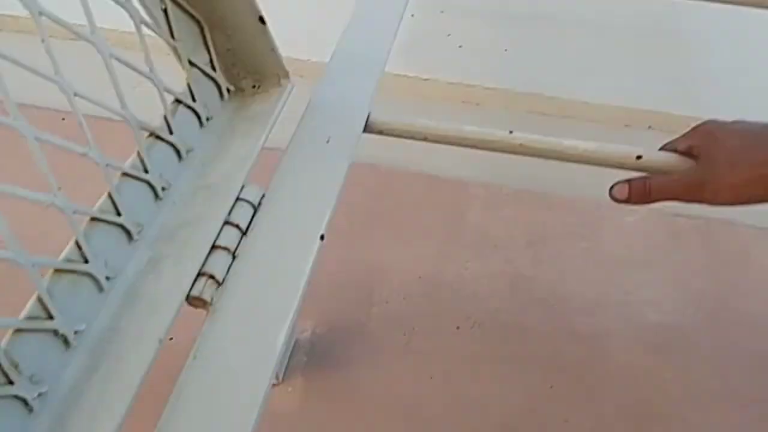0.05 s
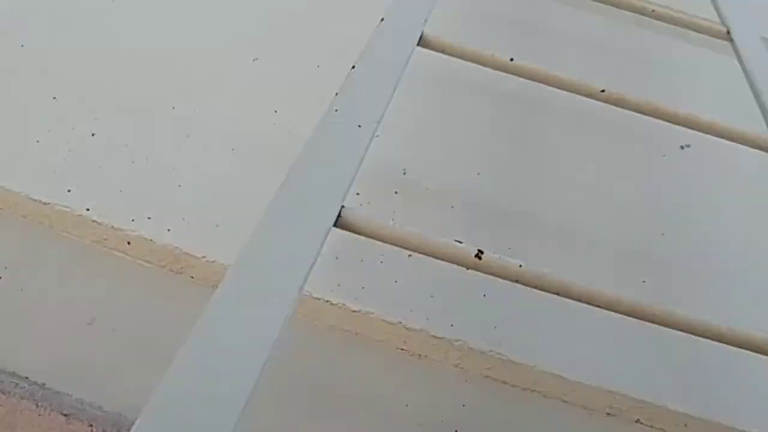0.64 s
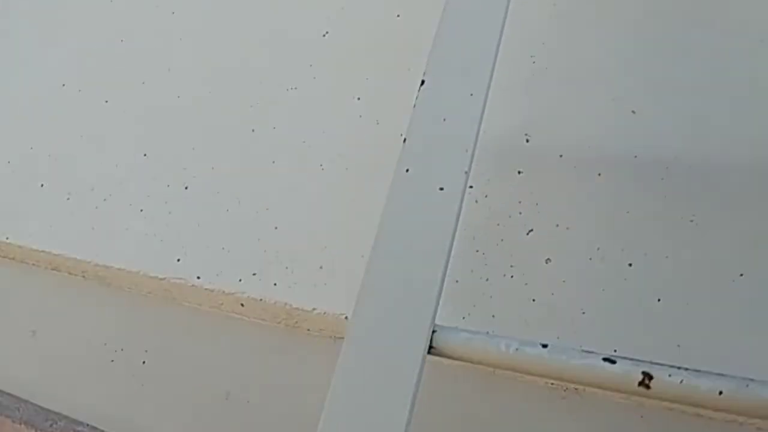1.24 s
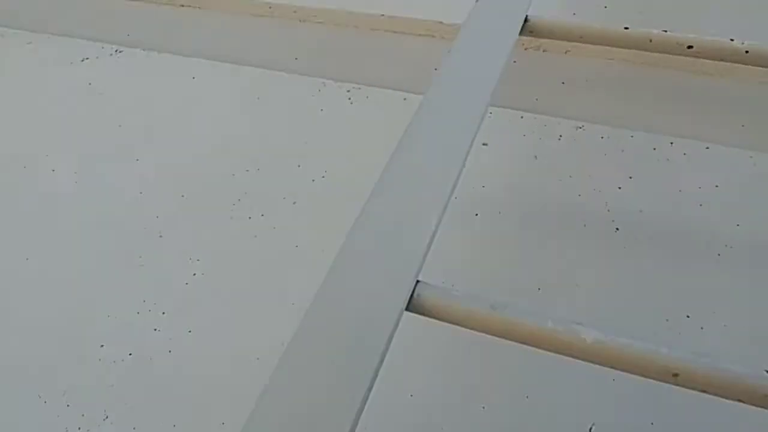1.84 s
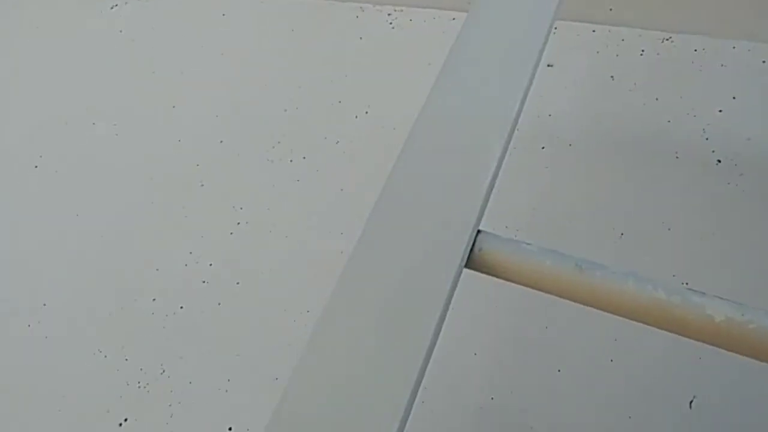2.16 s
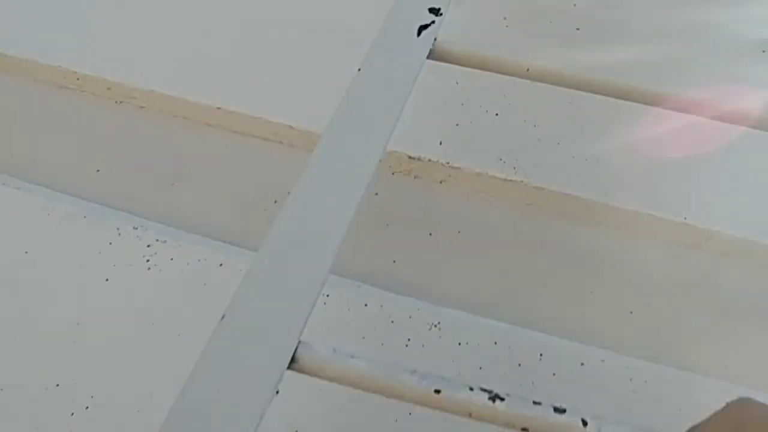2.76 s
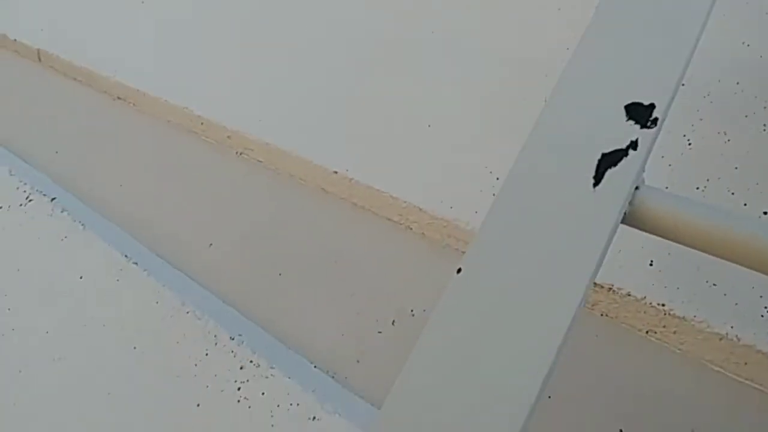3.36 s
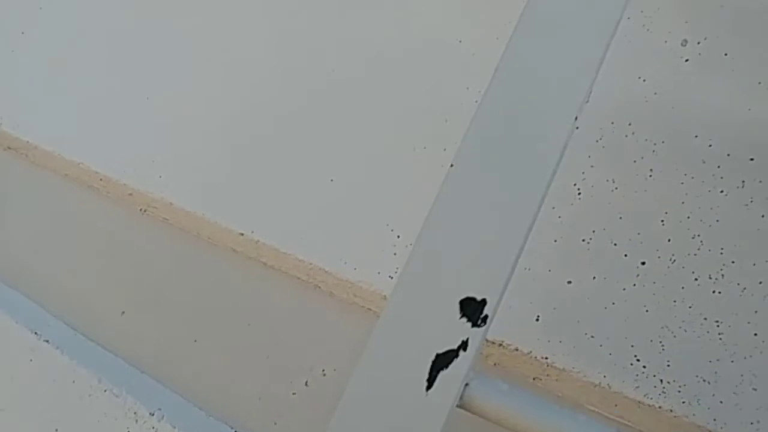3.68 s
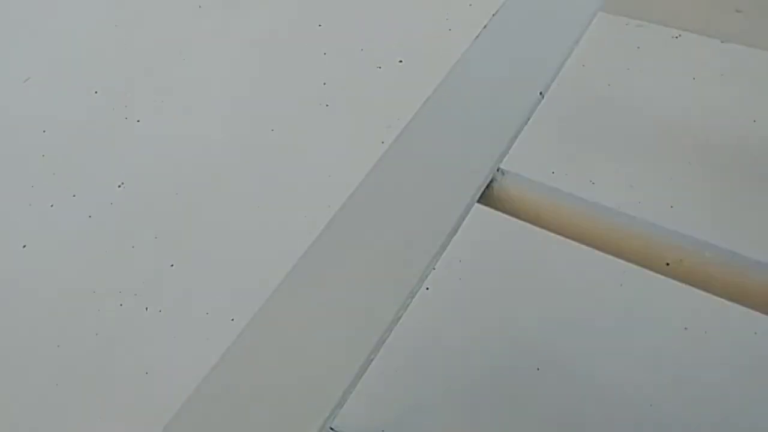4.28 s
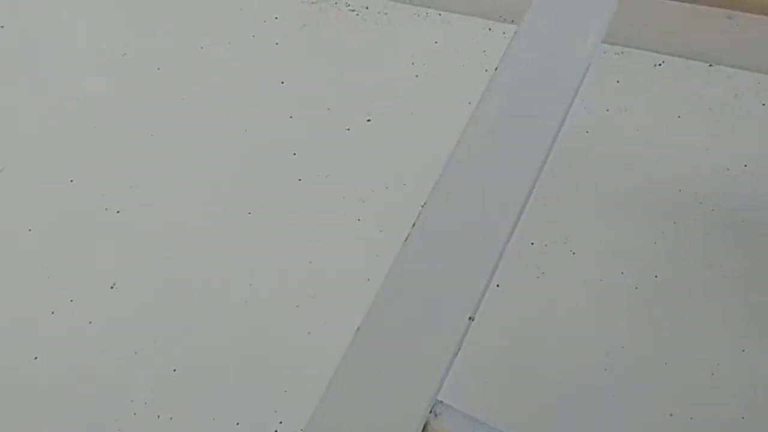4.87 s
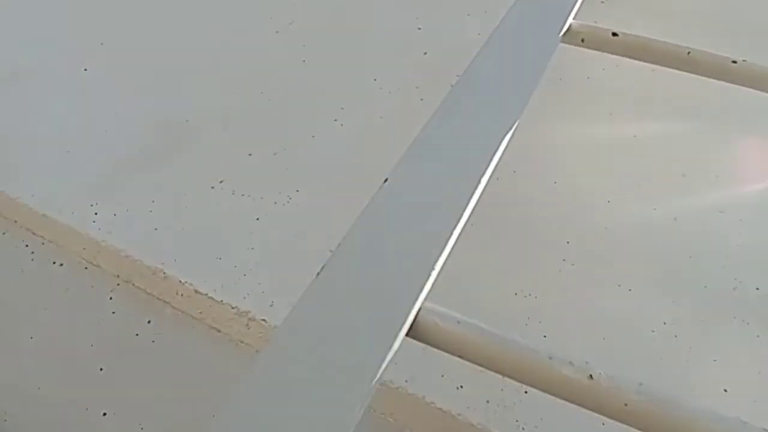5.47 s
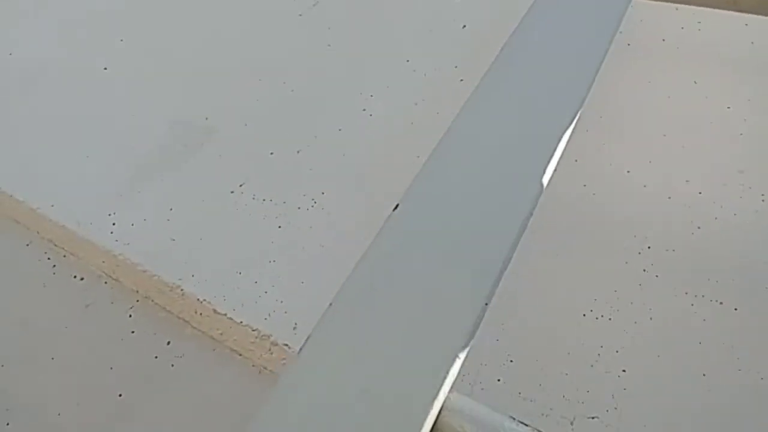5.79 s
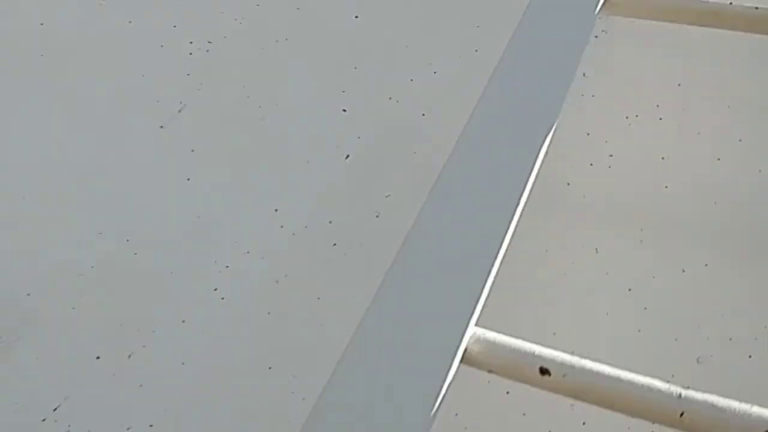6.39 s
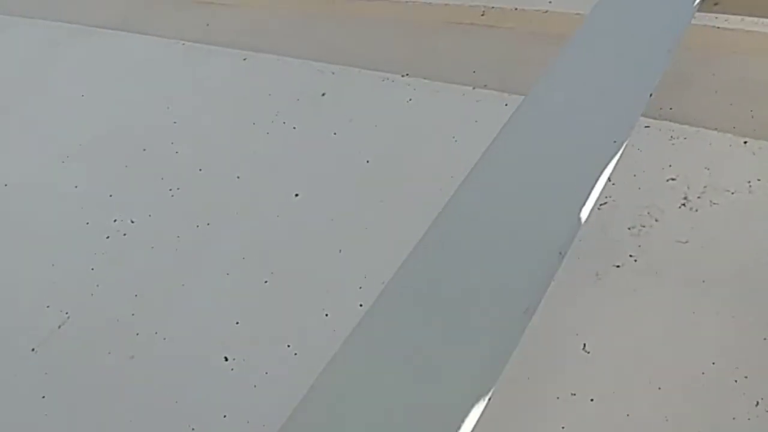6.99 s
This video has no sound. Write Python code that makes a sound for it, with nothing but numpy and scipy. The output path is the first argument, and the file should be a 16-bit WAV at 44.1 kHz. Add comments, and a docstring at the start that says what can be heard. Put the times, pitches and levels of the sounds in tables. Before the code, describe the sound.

Loose metal pieces on a climber's gear jingle and clink close to the microphone, in uneven bursts with each move up a steel ladder. Hands and soles make hollow knocks on the rungs, with a sharp tap near the start and another near the end. Low boot thuds come mostly in the second half. Clothes rustle lightly over an outdoor rumble and a faint machine hum.

```python
"""Three small loose metal pieces on a climber's gear chatter against each other at every move up a
steel ladder. Trains of tiny impacts set them ringing: bright clinks over a light tinkle. Hard taps and
hollow knocks of hands and soles sound on the rungs; boots thud in the ladder's low modes. An outside
wall adds a short scatter. Behind it: outdoor rumble, air, rustling clothes and a faint machine hum."""
import sys
import numpy as np
from scipy import signal
from scipy.fft import rfft, irfft, next_fast_len
from scipy.io import wavfile

SR = 44100
rng = np.random.default_rng(int(sys.argv[2]) if len(sys.argv) > 2 else 0)


def materialize(psi):
    """Save the field psi as 16-bit PCM at rate SR to the path in sys.argv[1].

    A 1-D psi becomes a single channel; in a 2-D psi each row is a channel.
    """
    bounded = np.clip(np.atleast_2d(psi).T, -1, 1)
    quanta = np.round(bounded * 32767).astype(np.int16)
    wavfile.write(sys.argv[1], SR, quanta)


N = 319284
T = np.arange(N) / SR


def amp(db):
    """Decibels to gain."""
    return 10 ** (np.asarray(db) / 20)


def unit_rms(x):
    """Scale to rms 1."""
    return x / np.sqrt(np.mean(abs(x) ** 2) + 1e-20)


def curve_at(points, hz, column=1):
    """Interpolate a table column over log frequency."""
    table = np.array(points, float)
    return np.interp(np.log(hz + 1), np.log(table[:, 0] + 1), table[:, column])


def add(mix, start_s, sound):
    """Mix a sound in at start_s."""
    part = mix[..., max(round(start_s * SR), 0):][..., :sound.shape[-1]]
    part += sound[..., :part.shape[-1]]


def drift(rate_hz):
    """Slow random motion, rms 1."""
    knots = rng.standard_normal(2000)
    return unit_rms(np.interp(T * rate_hz, np.arange(len(knots)), knots))


def ring(drive, hz, t60_s):
    """Complex resonator: magnitude is the envelope, real part the sound."""
    pole = np.exp((2j * np.pi * hz - np.log(1000) / t60_s) / SR)
    return signal.lfilter([1], [1, -pole], drive + 1e-18)


# tones heard in each bright clink: a main ring near 10-11 kHz with fainter, evenly spaced side tones: f/Hz,
# left/dB, right/dB
FIRST_PARTIALS = [(899, -25, -33), (2990, -22, -33), (4790, -25, -36), (6880, -14, -26), (8680, -27, -42),
                  (10776, 0, -19), (12600, -30, -42), (14662, -15, -30)]
SECOND_PARTIALS = [(1500, -26, -32), (2392, -22, -29), (5390, -25, -26), (6283, -12, -18), (9297, -20, -35),
                   (10174, 0, -16), (14065, -11, -13)]
# partials of the third piece: f/Hz, left/dB, right/dB
THIRD_PARTIALS = [(1680, -21, -23), (2050, -22, -24), (2460, -21, -16), (3290, -14, -17), (3560, -23, -17),
                  (4090, -18, -21), (6378, -2, 1), (7600, -17, -17), (8090, -16, -24), (11060, -7, -18),
                  (11490, -8, -7), (14100, -8, -6), (15130, -20, -14), (15385, -7, -1.5)]
# gear clinks: t/s, chatter/s, level/dB, second piece over first/dB, hardness/dB
CLINKS = [(0.107, 0.0034, -29, 5, -3.5), (0.281, 0.0025, -32.5, -18, -8.5),
          (0.396, 0.0028, -15.5, -25, -38), (0.544, .006, -17, 1, -13.5), (0.573, 0.01, -18.5, -22, -17),
          (0.672, 0.0092, -15.5, -18, -15.5), (0.7, 0.018, -10, -3, -12.5),
          (0.839, 0.0081, -22.5, -30, -7.5), (1.154, 0.022, -15, -19, -18), (1.44, 0.004, -23, -5, -19),
          (1.625, 0.035, -6.5, -4, -20.5), (1.674, 0.017, -19, 17, -2), (1.73, 0.045, -24, 9, -6.5),
          (1.768, 0.0042, -28, 1, 5), (1.792, 0.014, -20, -13, -10.5), (1.868, 0.036, -19, -8, -17.5),
          (1.954, 0.012, -19, 11, -29), (2.001, 0.0095, -14.5, -6, -23), (2.058, 0.015, -22.5, 5, -15),
          (2.412, 0.002, -31, 5.5, -12.5), (2.652, 0.04, -8, 3.5, -28), (2.735, .016, -22, 1, -25),
          (2.782, 0.032, -22, -17, -3), (2.801, 0.022, -11, 14, -16), (3.077, 0.012, -13, -11, -9.5),
          (3.222, 0.0046, -16.5, 1, -25), (3.262, 0.0041, -22.5, 12, -11.5), (3.325, 0.0025, -14, -16, -8),
          (3.534, 0.0037, -25.5, 0, -15), (3.698, .0024, -22, -4, -18.5), (3.735, 0.0037, -15, -16, -14.5),
          (3.872, 0.018, -14.5, -6, -40), (3.97, 0.016, -7.5, 7, -14.5), (3.995, 0.02, -23.5, 1, -1.5),
          (4.024, .016, -14, 9, -32), (4.059, 0.0011, -15.5, -16, -22), (4.076, 0.0023, -16.5, -22, -26),
          (4.455, .004, -21, 6, -13), (4.469, 0.0073, -12, -7, -19.5), (4.527, 0.0012, -12, -18, -20.5),
          (4.699, 0.0016, -23.5, -8, -21), (4.991, 0.0023, -23, 4, -13.5), (5.067, 0.022, -23, -1, -18),
          (5.203, 0.0069, -12, -3, -19), (5.223, 0.024, -10.5, 9, -13), (5.38, 0.006, -25, 1, -20),
          (5.449, 0.019, -27, -11, -9), (5.486, 0.0069, -23.5, 0, -2.5), (5.547, 0.01, -23.5, 11, -29),
          (5.666, 0.0054, -16.5, 1, -22), (5.68, .003, -21, 7, -4.5), (6.108, 0.0018, -40.5, -18, -3),
          (6.164, 0.0022, -23.5, -22, -17.5), (6.217, 0.0011, -24.5, 1, -18),
          (6.237, 0.0013, -19.5, 18, -32), (6.276, 0.0051, -16, 6.5, -15.5), (6.477, 0.022, -14, 16, -18),
          (6.513, 0.005, -9, -28, -21), (6.551, 0.0066, -7.5, -31, -11), (6.595, 0.012, -10.5, -14, -10.5),
          (6.938, 0.011, -15, -27, -18.5), (7.055, 0.0018, -11, 18, -27), (7.115, 0.0053, -14.5, 10, -14),
          (7.13, 0.0018, -14, -11, -21)]


def clinks(choked_t60_s=0.0027, t60_per_chatter=3.3, lead_in_db=-27.5, settle_s=0.0038,
           choke_s=0.0023, choke_db=12, scrape_db=-12):
    """Faint lead-in, hit, rebounds. Brief clinks are choked; hard ones add third piece and scrape."""
    rings, scrapes = np.zeros((2, N)), np.zeros((2, N))
    lead = SR // 150
    t = np.arange(-lead, SR // 8) / SR
    onset = np.where(t < 0, amp(lead_in_db) * (1 - t / t[0]), 1)
    for start_s, chatter_s, level_db, balance_db, hard_db in CLINKS:
        first_db = level_db - 10 * np.log10(1 + amp(balance_db) ** 2)  # two pieces share the energy
        second_db = first_db + balance_db - 2.5
        third_db = level_db + hard_db - 4.5
        held = slice(lead, lead + int((chatter_s + 0.004) * SR))
        envelope = onset * np.exp(-np.maximum(t - chatter_s, 0) / settle_s)
        t60_s = choked_t60_s + t60_per_chatter * chatter_s
        impacts = np.zeros(len(t))
        pieces = (FIRST_PARTIALS, first_db), (SECOND_PARTIALS, second_db), (THIRD_PARTIALS, third_db)
        for partials, db in pieces:
            drive = impact_train(len(t), per_s=900, spread_db=8) * envelope
            drive[lead] = 2  # main hit
            add(rings, start_s + t[0], amp(db) * metal_piece(drive, partials, t60_s, held))
            impacts += drive
        noise = scrape(impacts, pole=0.985)
        noise /= np.sqrt(np.mean(noise[:, held] ** 2))
        noise_db = level_db + hard_db + scrape_db + choke_db * np.exp(-chatter_s / choke_s)
        add(scrapes, start_s + t[0], amp(noise_db) * noise)
    return rings + contact_colour(scrapes)


def impact_train(size, per_s, spread_db):
    """Tiny random impacts of uneven strength."""
    strength = amp(spread_db * np.minimum(rng.exponential(1, size), 3))
    return strength * rng.choice([-1, 1], size) * (rng.random(size) < per_s / SR)


def metal_piece(drive, partials, t60_s, held, clearance=1.33, detune_hz=13.5, scatter_db=1.5):
    """A piece rings, detuned by contact, its swing limited by its neighbours; level set over held."""
    out = np.zeros((2, len(drive)))
    for hz, left_db, right_db in partials:
        tone = ring(drive, hz + detune_hz * rng.standard_normal(), t60_s)
        power = abs(tone) ** 2
        limiting = 1 / (1 + power / (power[held].mean() * clearance ** 2))
        tone *= np.sqrt(limiting / (limiting * power)[held].mean())
        tone *= amp(scatter_db * rng.standard_normal())
        turn = np.exp(2j * np.pi * rng.random())  # the piece turns about
        out[0] += amp(left_db) * tone.real
        out[1] += amp(right_db) * (tone * turn).real
    return out


def scrape(impacts, pole):
    """Each impact scrapes: a fading burst of stereo noise."""
    envelope = np.sqrt(signal.lfilter([1], [1, -pole], impacts ** 2))
    return envelope * rng.standard_normal((2, len(impacts)))


# spectrum of bare contacts: f/Hz, left/dB, right/dB
CONTACT_SPECTRUM = [(300, 4.5, -30), (870, 6, 0), (1940, 3, 1), (2820, 8.5, 3), (4400, 2, 0.5),
                    (5610, 10, 13.5), (7110, 20, 10.5), (8260, -26, 3.5), (9440, 13, -47),
                    (11400, 20.5, -27), (11500, -4, -20), (13700, 13.5, -35), (15400, -18, -11)]


def contact_colour(drive, size=2048, ripple_db=4, ripple_step_hz=85):
    """Colour of bare metal contacts, rippled by many weak resonances."""
    hz = abs(np.fft.fftfreq(size, 1 / SR))
    grid_hz = np.arange(0, SR / 2, ripple_step_hz)
    colour_db = []
    for channel in (1, 2):
        ripple = np.interp(hz, grid_hz, rng.standard_normal(len(grid_hz)))
        colour_db.append(curve_at(CONTACT_SPECTRUM, hz, channel) + ripple_db * ripple)
    minimum_phase = np.exp(np.conj(signal.hilbert(np.log(amp(colour_db)))))
    return signal.oaconvolve(drive, np.fft.ifft(minimum_phase).real, axes=1)[:, :N]


# pulls and steps that stir the gear: start/s, end/s, level/dB
MOVES = [(0.374, 0.41, -33.5), (0.534, 0.75, -39), (0.826, 0.879, -41), (0.975, 1.221, -43),
         (1.32, 1.497, -53), (1.545, 1.806, -34), (1.876, 2.217, -48.5), (2.632, 2.917, -35.5),
         (2.96, 3.103, -43.5), (3.163, 3.39, -43.5), (3.658, 3.85, -52), (3.964, 4.099, -33),
         (4.215, 4.416, -56.5), (4.755, 4.952, -59.5), (5, 5.12, -41), (5.48, 5.552, -42.5),
         (5.66, 5.985, -49), (6.202, 6.42, -49), (6.457, 6.645, -38.5), (6.956, 7.195, -48)]


def body_motion(rise_s=0.028, settle_s=0.028, rest_db=-63):
    """Envelope of the climb: each move rises, holds and settles to a low floor."""
    power = amp(rest_db) ** 2
    for start_s, end_s, db in MOVES:
        shape = np.exp(-np.maximum(start_s - T, 0) / rise_s - np.maximum(T - end_s, 0) / settle_s)
        power = power + (amp(db) * shape) ** 2
    return np.sqrt(power)


def tinkle(t60_s=0.078, scrape_db=-8):
    """The pieces keep touching lightly as the body sways."""
    out, touches = np.zeros((2, N)), np.zeros(N)
    impulse = signal.unit_impulse(SR // 10)
    for partials, db in ((FIRST_PARTIALS, 0.5), (SECOND_PARTIALS, -3.5), (THIRD_PARTIALS, -6)):
        drive = impact_train(N, per_s=45, spread_db=4.5)
        ping = metal_piece(impulse, partials, t60_s, held=slice(None), clearance=30)
        out += amp(db) * unit_rms(signal.oaconvolve(drive[None], ping, axes=1)[:, :N])
        touches += drive
    out += amp(scrape_db) * contact_colour(unit_rms(scrape(touches, pole=0.99)))
    return body_motion() * out


# hard taps on a rung: t/s, peak/dB
TAPS = [(0.398, -39), (0.672, -17), (0.7, -8.5), (0.84, -33), (1.503, -26), (6.551, -5), (6.563, -18)]
# modes of a tap: f/Hz, level/dB, t60/s
TAP_MODES = [(1510, -6, 0.026), (2280, -8, 0.013), (3700, 12, 0.004), (4060, 0.5, 0.0053), (4420, 4, 0.029),
             (5270, -7.5, 0.0034)]


def rung_taps(crush_s=0.00039):
    """Something hard meets painted steel: a tiny crunch drives short mid modes."""
    out, t = np.zeros((2, N)), np.arange(SR // 12) / SR
    for start_s, peak_db in TAPS:
        crunch = rng.standard_normal((2, len(t))) * np.exp(-t / crush_s)
        tap = sum(amp(db) * unit_rms(ring(crunch, hz, t60_s).real) for hz, db, t60_s in TAP_MODES)
        add(out, start_s, amp(peak_db) * tap / abs(tap).max())
    return out


# palms and soles on the rungs: t/s, level/dB, centre f/Hz, contact fade/s
KNOCKS = [(0.396, -28, 527, 0.01), (0.583, -21.5, 383, 0.008), (1.156, -25.5, 530, 0.012),
          (1.504, -22, 600, 0.0037), (1.649, -27, 756, 0.022), (1.74, -30, 576, 0.024),
          (2.269, -34.5, 476, .04), (2.638, -26.5, 530, 0.01), (3.511, -30, 460, 0.0057),
          (3.954, -32.5, 400, 0.0096), (4.755, -28.5, 537, 0.0067), (5.21, -33.5, 450, 0.022),
          (5.70, -29, 605, 0.059), (6.033, -27.5, 570, 0.018), (6.365, -29, 540, 0.0043)]


def rung_knocks(gain_db=-1, relative_bandwidth=0.74, side_gain=0.45):
    """A palm or sole meets a rung: a damped, hollow knock, drawn out when it slides."""
    out, t = np.zeros((2, N)), np.arange(SR // 5) / SR
    for start_s, db, hz, fade_s in KNOCKS:
        slap = rng.standard_normal((2, len(t))) * np.exp(-t / fade_s)
        t60_s = np.log(1000) / (np.pi * relative_bandwidth * hz)
        mid, side = ring(ring(slap, hz, t60_s), hz, t60_s)
        knock = np.array([mid + side_gain * side, mid - side_gain * side]).real
        add(out, start_s, amp(db + gain_db) * np.sqrt(2) * knock / abs(mid).max())
    return out


# boots loading the ladder: t/s, level/dB, judder length/s
THUDS = [(0.588, -34, 0), (4.5, -23, 0.14), (4.858, -29, 0), (4.94, -30.5, 0), (5.708, -24, 0),
         (6.666, -29.5, 0)]
# low ladder modes: nominal f/Hz, level/dB, t60/s
LADDER_MODES = [(107, -8, 0.17), (137.3, 6, 0.059), (194, -4, 0.06), (259, -25.5, 0.18), (378, -26, 0.03)]


def boot_thuds(gain_db=8, push_s=0.015, judder_step_s=0.038, judder_db=-2):
    """A soft sole pushes the ladder into its low modes; a heavy step judders."""
    out, t = np.zeros(N), np.arange(SR // 3) / SR
    attack = 1 - np.exp(-t / push_s)
    for start_s, db, judder_s in THUDS:
        for push in range(1 + int(judder_s / judder_step_s)):
            thud = np.zeros(len(t))
            for hz, mode_db, t60_s in LADDER_MODES:
                decay = np.exp(-np.log(1000) * t / t60_s)
                thud += amp(mode_db) * decay * np.sin(2 * np.pi * hz * rng.uniform(0.83, 1.04) * t)
            push_db = db + gain_db + judder_db * (push > 0)
            add(out, start_s + push * judder_step_s, amp(push_db) * attack * thud)
    return out


def wall_scatter(near, t60_s=0.065, delay_s=0.0018, echoes_per_s=3000):
    """Wall and rails throw back short, thin reflections."""
    t = np.arange(SR // 4) / SR
    echoes = rng.standard_normal((2, len(t))) * (rng.random((2, len(t))) < echoes_per_s / SR)
    echoes *= (t > delay_s) * np.exp(-np.log(1000) * t / t60_s)
    return signal.oaconvolve(near, echoes / np.linalg.norm(echoes[0]), axes=1)[:, :N]


# open-air spectrum: f/Hz, relative density/dB
AIR_SPECTRUM = [(20, -37), (35, -12), (54, 5), (80, 3), (115, 3), (200, -7), (320, -11), (530, -6),
                (800, -14), (1200, -22), (1800, -32), (3800, -38), (5600, -36), (8500, -45), (10700, -42),
                (13000, -49), (16000, -52)]
# stereo likeness of the air: f/Hz, left-right correlation
AIR_CORRELATION = [(60, 1), (200, 0.9), (400, 0.91), (800, 0.116), (1500, 0.049), (8000, 0.9)]


def outdoors(split_hz=280, rumble_db=-46, rise_db_per_s=0.75, wash_db=-46, rustle_db=-47):
    """Far, near-mono rumble, slowly growing, under a wider wash of air and clothes rustling on moves."""
    size = next_fast_len(N, real=True)
    hz = np.fft.rfftfreq(size, 1 / SR)
    left, independent = rfft(rng.standard_normal((2, size)))
    correlation = curve_at(AIR_CORRELATION, hz)
    right = correlation * left + np.sqrt(1 - correlation ** 2) * independent
    air = np.array([left, right]) * amp(curve_at(AIR_SPECTRUM, hz))
    low_share = 1 / (1 + (hz / split_hz) ** 4)
    rumble = unit_rms(irfft(air * np.sqrt(low_share), size)[:, :N])
    rumble *= amp(rumble_db + rise_db_per_s * T)
    motion = body_motion()
    rustle_gain = amp(rustle_db) * (motion / motion.max()) ** 0.95
    wash = unit_rms(irfft(air * np.sqrt(1 - low_share), size)[:, :N])
    wash *= np.hypot(amp(wash_db), rustle_gain)
    flicker_db = 1.5 * drift(rate_hz=12) + 2 * drift(rate_hz=28)
    return rumble + wash * amp(flicker_db)


# machine hum partials: f/Hz, level/dB
HUM_PARTIALS = [(118, -51.5), (231, -72), (291, -65.5), (399, -64)]


def machine_hum(waver=0.013):
    """Faint machine tones, each wavering in pitch."""
    out = np.zeros(N)
    for hz, db in HUM_PARTIALS:
        pitch_hz = hz * (1 + waver * drift(rate_hz=25))
        out += amp(db) * np.sqrt(2) * np.sin(2 * np.pi * np.cumsum(pitch_hz) / SR)
    return out


def scene(wall_db=-7.5):
    """Gear and rungs close by with their wall scatter; boots, open air and hum beneath."""
    near = clinks() + tinkle() + rung_taps() + rung_knocks()
    return near + amp(wall_db) * wall_scatter(near) + boot_thuds() + outdoors() + machine_hum()


def record(dry, ceiling=0.85, cutoff_hz=15800):
    """Soft peak limit, then low-pass."""
    rounded = dry / (1 + (dry / ceiling) ** 6) ** (1 / 6)
    lowpass = signal.firwin(255, cutoff_hz, window=("kaiser", 8), fs=SR)
    return signal.oaconvolve(rounded, lowpass[None], "same", axes=1)


dry = scene()
out = record(dry)
materialize(out)
```